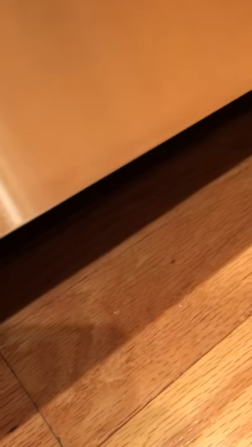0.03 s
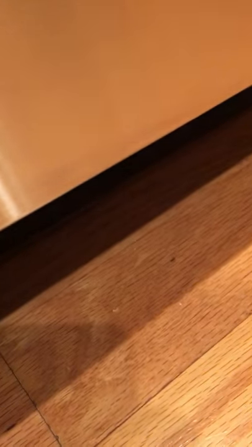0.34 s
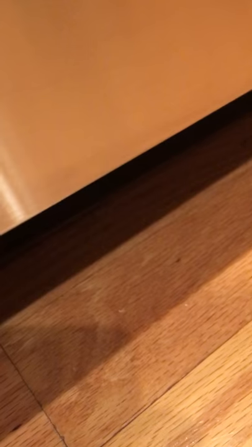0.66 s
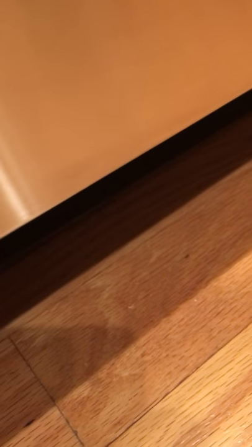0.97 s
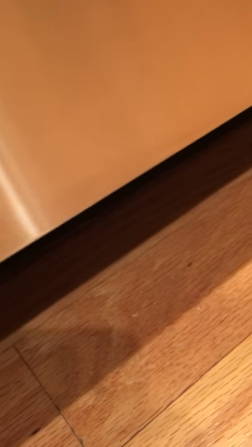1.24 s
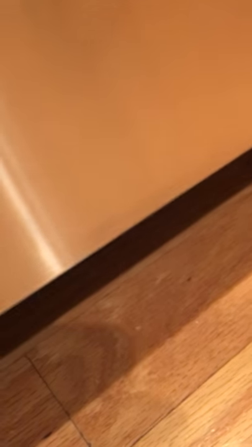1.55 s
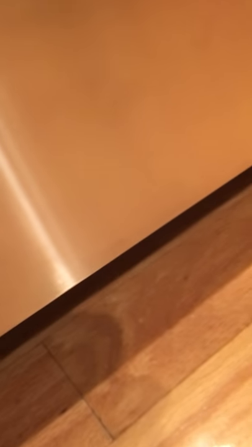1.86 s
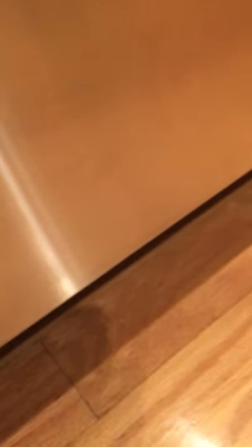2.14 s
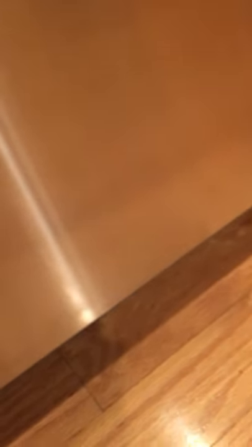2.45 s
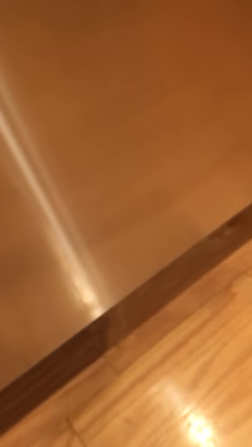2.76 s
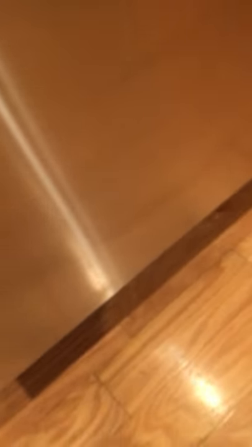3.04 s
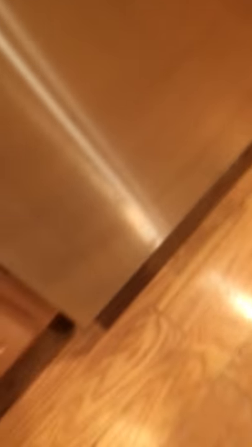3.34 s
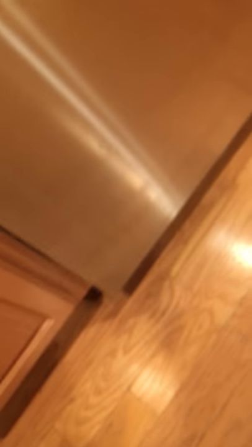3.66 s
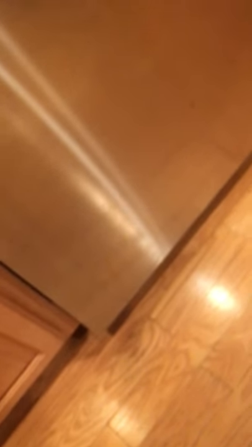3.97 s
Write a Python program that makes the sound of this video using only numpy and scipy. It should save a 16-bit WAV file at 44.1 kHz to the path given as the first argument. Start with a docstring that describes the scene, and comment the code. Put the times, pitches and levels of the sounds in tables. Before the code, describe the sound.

A dishwasher runs throughout, with a low drumming of spray and a steady, buzzy pump whine. Heard close at first, water sloshes and thumps irregularly in the tub, with a cluster of slaps on the door and light ticks around 1.7 to 2 seconds. From about 1.4 seconds the microphone backs into the kitchen, and the sound gradually softens, with a few weaker sloshes until 4 seconds.

```python
"""Dishwasher in a kitchen

The microphone starts close at the kick plate and backs into the room from about 1.4 s on.
The pump motor sings and buzzes on shaft and bearing lines, and its drive whistles faintly.
Spray drums in the tub, with heavier sloshes, slaps on the door and a few light ticks."""
import sys
import numpy as np
from scipy import signal
from scipy.fft import rfft, irfft
from scipy.io import wavfile
from scipy.ndimage import uniform_filter1d

SR = 44100
rng = np.random.default_rng(int(sys.argv[2]) if len(sys.argv) > 2 else 0)


def int16_out(signal):
    """Quantize to a 16-bit WAV file."""
    q = np.round(np.clip(np.atleast_2d(signal).T, -1, 1) * 32767)
    wavfile.write(sys.argv[1], SR, q.astype(np.int16))


N = 176400

SHAFT_HZ, CAGE_HZ = 35.03, 13.1  # turning rates of the pump shaft and the bearing cage
# spectrum of water drumming in the tub (frequency [Hz], close level [dB], far level [dB])
TUB_SPECTRUM = [(22.6, -100, -102), (37.4, -70, -80), (52, -66, -62.5), (88, -55, -65.5),
                (107.5, -64.5, -64), (108, -49.5, -56.5), (131.5, -57, -63.5), (146, -63, -70.5),
                (172, -64.5, -69), (216, -67.5, -72), (265.6, -60.5, -69), (316, -66.5, -70),
                (348, -66, -73), (463, -76, -83), (590, -74.5, -84.5), (750, -81.5, -90), (970, -88, -99.5),
                (1400, -96, -99), (2500, -106, -110), (8000, -135, -140)]


def undb(db):
    """Decibels to gain."""
    return 10 ** (np.asarray(db) / 20)


def unit(x):
    """Scale to rms 1."""
    return x / np.sqrt(np.mean(x ** 2))


def curve(rows):
    """Join (time, value) rows by straight lines."""
    return np.interp(np.arange(N) / SR, *np.array(rows).T)


def walk(rate_hz, hold=8):
    """A smooth random drift with a spread near 1."""
    steps = np.repeat(rng.standard_normal(int(rate_hz * N / SR) + 2), hold)
    smooth = 1.3 * uniform_filter1d(uniform_filter1d(steps, hold), hold)
    return np.interp(np.arange(N), np.arange(len(smooth)) * SR / rate_hz / hold, smooth)


def colour(x, hz, db):
    """Filter by a spectrum of points on a log-frequency axis."""
    f = np.maximum(np.arange(len(x) // 2 + 1) * SR / len(x), 1)
    return irfft(rfft(x) * undb(np.interp(np.log(f), np.log(hz), db)), len(x))


def at_microphone(x, spectrum, far):
    """Blend a source from its close colour (far = 0) to its far one (1); beyond that it only fades."""
    hz, close_db, far_db = np.array(spectrum).T
    x, share = unit(x) * np.sqrt(SR / 2), np.clip(far, 0, 1)
    return ((1 - share) * colour(x, hz, close_db) + share * colour(x, hz, far_db)) / np.maximum(far, 1)


def add(out, start_s, x):
    """Mix a short sound in at a time."""
    i = max(int(start_s * SR), 0)
    out[i:i + len(x)] += x[:max(N - i, 0)]


def burst(hz, db, rise_s, decay_s):
    """Coloured noise that swells and dies away; rms 1 at its top."""
    t = np.arange(SR // 5) / SR
    shape = (1 - np.exp(-t / rise_s)) ** 2 * np.exp(-t / decay_s)
    x = colour(rng.standard_normal(len(t)), hz, db) * shape
    return x * np.sqrt(np.sum(shape ** 2) / np.sum(x ** 2)) / shape.max()


def standing_waves(x, t):
    """Narrow bands swell or drop as the microphone crosses the kitchen's loud and dead spots."""
    # spots on the way (time [s], half length [s], frequency [Hz], half width [Hz], gain [dB])
    spots = [(1.8, 0.51, 2060, 140, 3.5), (2.2, 0.21, 1850, 68, 6.5), (2.5, 0.69, 1650, 38, 9.5),
             (2.54, 0.22, 1474, 130, -9), (3.01, 0.11, 1540, 17, 8.5), (3.15, 0.072, 1835, 30, 5),
             (3.17, 0.34, 1650, 140, -3.5), (3.43, 0.07, 2020, 100, 5.5), (3.7, 0.2, 1620, 100, 4.5),
             (2.32, 0.35, 3300, 110, 5), (3.7, 0.19, 3290, 120, -2.5), (3.3, 0.13, 4094, 50, 4),
             (2.76, 0.67, 5900, 130, 5.5), (2.25, 0.17, 6400, 98, 1), (3.9, .4, 900, 60, -8.5),
             (2.8, 0.33, 860, 56, 3)]
    f = np.arange(N // 2 + 1) * SR / N
    out, spectrum = x, rfft(x)
    for time, length, hz, width, db in spots:
        band = irfft(spectrum * np.exp(-((f - hz) / width) ** 2), N)
        gain = undb(db * np.exp(-((t - time) / length) ** 2))
        out = out + band * (gain - 1)
    return out


def cabinet(x, far, ripple_db=2.2, width_hz=45):
    """Dense resonances under the cabinet ripple the spectrum, in a pattern that shifts with distance."""
    bins, span = N // 2 + 1, int(width_hz * N / SR)
    treble = np.clip((np.arange(bins) * SR / N - 2000) / 1000, 0, 1)  # sets in from 2 to 3 kHz
    spectrum, out, far = rfft(x), 0, np.clip(far, 0, 1)
    for share in (1 - far, far):
        ripple = uniform_filter1d(uniform_filter1d(rng.standard_normal(bins), span), span)
        ripple = unit(ripple - uniform_filter1d(ripple, 10 * span))
        out = out + share * irfft(spectrum * undb(ripple_db * treble * ripple), N)
    return out


def rustles(t):
    """Brief grainy swells of high hiss."""
    # soft rustles (time [s], half length [s], level [dB])
    swells = [(.41, .03, -69), (1.73, 0.086, -63.5), (1.92, .04, -68), (2.282, 0.057, -64),
              (3.635, 0.061, -67)]
    # their spectrum (frequency [Hz], level [dB])
    spectrum = [(500, -30), (5000, 6), (12500, -2), (16000, -3)]
    envelope = sum(undb(db) * np.exp(-((t - time) / length) ** 2) for time, length, db in swells)
    grains = rng.standard_normal(N) * undb(3 * walk(200))
    return envelope * unit(colour(grains, *np.array(spectrum).T))


def drops(far, per_s=40, decay_s=0.0012):
    """Fine drops patter at random, each with its own pitch, fainter from across the room."""
    out, t = np.zeros(N), np.arange(SR // 40) / SR
    for when, pitch, softness in rng.random((int(per_s * N / SR), 3)):
        ping = np.sin(2 * np.pi * (4500 + 9000 * pitch) * t) * np.exp(-t / decay_s)
        db = -65 - 3.6 * np.log(0.02 + softness)  # many faint, a few louder
        add(out, when * N / SR, undb(db) * ping)
    return out * undb(-7 * far)


def ticks():
    """Light drips tick, each a short band of high noise."""
    # ticks and drips (time [s], level [dB], centre [Hz], width [octaves])
    drips = [(.038, -60, 8300, .2), (.63, -59, 7900, .15), (.8, -61, 11000, .15), (1.131, -46, 6400, 0.15),
             (1.394, -55, 6500, 0.18), (1.615, -62, 12000, .4), (1.658, -42, 5740, .2),
             (1.661, -44, 3900, .3), (1.689, -50, 4270, 0.81), (1.717, -56, 7000, 0.29),
             (1.739, -54, 5500, 0.38), (1.782, -55, 8100, 0.26), (1.892, -58, 11100, .2),
             (1.915, -61, 12000, 0.27), (1.979, -58, 6000, .6), (2.314, -54.5, 8700, 0.25),
             (3.192, -62, 7300, 0.42), (3.604, -60, 9500, .3), (3.619, -58.5, 8900, 0.2),
             (3.69, -67, 10000, .4)]
    out, offsets = np.zeros(N), np.linspace(-4, 4, 17)
    band_db = -20 * np.log10(1 + offsets ** 4 / 2)
    for time, db, hz, width in drips:
        tick = burst(hz * 2 ** (offsets * width), band_db, rise_s=0.0007, decay_s=0.004)
        add(out, time, undb(db) * tick)
    return out


def slaps():
    """Water slaps the inside of the door with a sharp, hollow knock."""
    # hits on the door (time [s], level [dB])
    hits = [(.075, -42.5), (.143, -44), (.505, -48), (.887, -54), (.944, -45), (1.688, -43), (1.712, -44),
            (1.729, -40), (1.744, -45), (1.891, -37.5), (1.913, -41), (1.959, -41.5), (2.064, -55),
            (2.35, -49), (3.193, -52)]
    # spectrum of a slap (frequency [Hz], level [dB])
    spectrum = [(150, -24), (300, 3), (500, -3.5), (950, 2), (1400, -21), (3000, -59), (10000, -60)]
    out = np.zeros(N)
    for time, db in hits:
        add(out, time, undb(db) * burst(*np.array(spectrum).T, rise_s=0.00049, decay_s=0.012))
    return out


def sloshes(rise_s=0.0053):
    """Heavy water splashes against the tub and sets its low modes booming."""
    # hits on the tub (time [s], level [dB])
    hits = [(.005, -47), (.15, -32), (.45, -35.5), (.73, -31.5), (0.756, -53), (.855, -37.5), (.965, -52),
            (1.09, -41), (1.175, -35), (1.455, -36.5), (1.695, -34), (1.776, -38), (1.915, -31),
            (1.935, -35), (2.604, -38), (3.189, -40), (3.605, -43.5)]
    # modes of the tub (frequency [Hz], level [dB], decay [s])
    modes = [(80, -5, 0.028), (114.2, 0, 0.026), (263.5, -8.5, 0.013)]
    out, t = np.zeros(N), np.arange(SR // 5) / SR
    tub_hz, close_db, _ = np.array(TUB_SPECTRUM).T
    for time, hit_db in hits:
        ring = sum(undb(db) * np.exp(-t / decay) * np.sin(2 * np.pi * (hz * t + rng.random()))
                   for hz, db, decay in modes)
        boom = undb(3) * ring * (1 - np.exp(-t / rise_s))
        splash = undb(-3) * burst(tub_hz, close_db, rise_s, decay_s=0.015)
        add(out, time, undb(hit_db) * (boom + splash))
    return out


def spray(far, hits_per_s=1300, spread_db=2.5, churn_db=0.9):
    """Dense impacts of the jets drum on the tub."""
    # force of the spray as the arm turns (time [s], level [dB])
    force = [(0, -2), (.3, -4.5), (.6, -3), (.8, -0.5), (1.2, -1.5), (1.5, -4), (1.72, 1.5), (1.93, -0.5),
             (2.02, 0.5), (2.5, -1.5), (3.1, -2), (3.4, -4.5), (3.65, -2.5), (4, -5)]
    hits = (rng.random(N) < hits_per_s / SR) * rng.choice([-1, 1], N)
    strength = undb(spread_db * rng.standard_normal(N) + churn_db * walk(16))
    return at_microphone(hits * strength, TUB_SPECTRUM, far) * undb(curve(force))


def pump_hiss(clock, far, throb_hz=154, flicker_db=0.36):
    """The pump hisses, throbbing as the bearing balls pass."""
    # hiss of pump and spray (frequency [Hz], close level [dB], far level [dB])
    spectrum = [(900, -90, -100), (1760, -80.5, -88), (2380, -89, -89.5), (2950, -96.5, -99),
                (3720, -92, -101), (4670, -101, -104), (5020, -87.5, -99), (5350, -93.5, -103),
                (5820, -97, -99), (6200, -101, -105), (6080, -90.5, -102), (7100, -100, -107),
                (8400, -104, -110), (9100, -103, -109), (10450, -108, -115), (10900, -105, -112),
                (11600, -110, -115), (15500, -112, -117)]
    throb = 1 + 0.11 * np.sin(2 * np.pi * throb_hz * clock)
    flicker = undb(flicker_db * walk(25.2))
    return at_microphone(rng.standard_normal(N) * throb * flicker, spectrum, far)


def bearing_buzz(clock, far, size=4096):
    """A rough pattern repeats with each shaft turn; the cage puts sidebands on every harmonic."""
    # buzz through the housing (frequency [Hz], close level [dB], far level [dB])
    spectrum = [(714, -90.5, -99), (1080, -88, -90.5), (1300, -86.5, -101), (1410, -87.5, -100.5),
                (1620, -86, -88), (1820, -82.5, -91), (2080, -95, -88), (1990, -90, -97.5),
                (2120, -91.5, -83), (2380, -95, -97.5), (2600, -91, -90.5), (2880, -81.5, -93),
                (3030, -84, -87), (3310, -87, -95.5), (3800, -106.5, -100), (3660, -92.5, -93.5),
                (4200, -96, -101), (6630, -103, -112)]
    low_hz, high_hz = spectrum[0][0], spectrum[-1][0]
    out, k = 0, np.arange(size)
    in_band = (k * SHAFT_HZ > low_hz) & (k * SHAFT_HZ < high_hz)
    for side in range(-2, 3):
        phases = np.exp(2j * np.pi * rng.random(size))
        gains = undb(4.5 * rng.standard_normal(size) - 2 * abs(side))
        one_turn = np.fft.ifft(phases * gains * in_band)
        turning = np.interp(clock * SHAFT_HZ * size % size, k, one_turn)
        out = out + np.real(turning * np.exp(2j * np.pi * side * CAGE_HZ * clock))
    return at_microphone(out, spectrum, far) * np.sqrt((high_hz - low_hz) / (SR / 2))


def bearing_whine(clock, far, hz=2915, swing_hz=65):
    """A bearing whine swings in pitch and level each time the shaft laps the cage."""
    lap_hz = SHAFT_HZ - CAGE_HZ
    lap = 2 * np.pi * lap_hz * clock + 0.5 * walk(10)
    tone = np.sin(2 * np.pi * hz * clock + swing_hz / lap_hz * np.sin(lap) + 0.5 * walk(22))
    return undb(-61 - 10 * far) * (1 + np.cos(lap - 1)) * tone


def motor_tones(clock, far, flutter_db=1.37, standing_wave_db=0.44):
    """Tones follow the motor speed and waver; standing waves sway them as the microphone backs off."""
    # tones of the motor and its drive (frequency [Hz], close level [dB], far level [dB])
    tones = [(889, -57, -65), (959, -61, -72), (1113, -66, -77), (1269, -64, -71), (1450, -61, -71),
             (1463, -61, -71), (1528, -61, -76), (1540, -48, -58), (1554, -59, -67), (1575, -61, -66),
             (1644, -63, -63), (1671, -76, -62), (1694, -61, -62), (1715, -61, -66), (1722, -56, -62),
             (1728, -57, -62), (1734, -59, -67), (1750, -64, -70), (1774, -65, -68), (1787, -61, -69),
             (1799, -61, -72), (1812, -64, -64), (1825, -63, -69), (1847, -56, -58), (1903, -65, -69),
             (2001, -68, -66), (2023, -68, -66), (2036, -56, -57), (2058, -62, -73), (2085, -62, -67),
             (3268, -59, -68), (4094, -61, -72), (5683, -72, -83), (5905, -74, -78), (6400, -72, -87),
             (14789, -74, -85), (15069, -78, -83), (15349, -79, -85)]
    out = 0
    for hz, close_db, far_db in tones:
        db = close_db + (far_db - close_db) * far + flutter_db * walk(14)
        db += standing_wave_db * np.clip(far, 0, 1) * walk(3.146)
        if hz > 10000:  # the drive's whistle sits a little lower in level
            db -= 1
        waver_rad = 0.15 * min(hz, 5060) / 1000 * walk(22)
        out = out + undb(db) * np.sin(2 * np.pi * (hz * clock + rng.random()) + waver_rad)
    return np.sqrt(2) * out


def scene():
    """Motor and water on one microphone, carried back from the kick plate."""
    # path of the microphone (time [s], distance [0 close, 1 far])
    retreat = [(0, 0), (1.4, 0.045), (2.1, 0.44), (2.6, 0.77), (3.1, 1.025), (4, 1.33)]
    t, far = np.arange(N) / SR, curve(retreat)
    clock = np.cumsum(1 + 0.00028 * walk(3.89)) / SR  # time as the motor keeps it, wobbling slightly
    singing = motor_tones(clock, far) + bearing_whine(clock, far)
    buzzing = cabinet(bearing_buzz(clock, far) + pump_hiss(clock, far), far)
    motor = standing_waves(singing + buzzing, t)
    water = spray(far) + sloshes() + slaps() + ticks() + drops(far)
    return (motor + water + rustles(t))[None]


def record(dry, top_hz=15720):
    """The recorder cuts the highest treble steeply."""
    return signal.sosfilt(signal.ellip(12, 0.2, 70, top_hz, fs=SR, output="sos"), dry)


dry = scene()
out = record(dry)
int16_out(out)
```